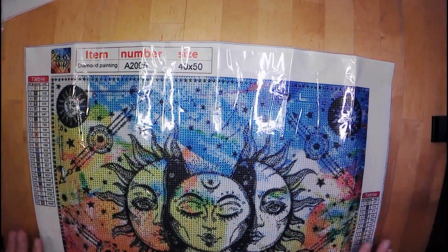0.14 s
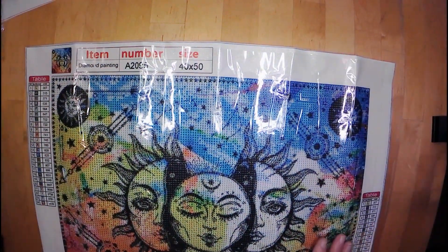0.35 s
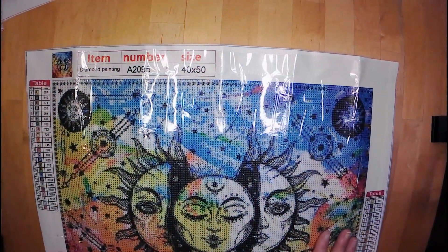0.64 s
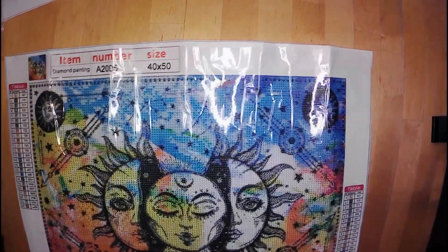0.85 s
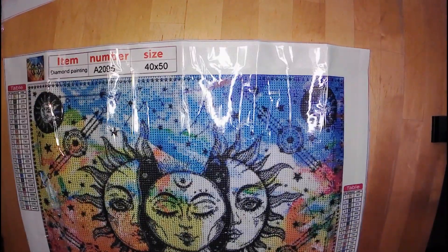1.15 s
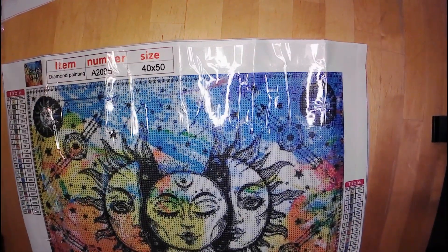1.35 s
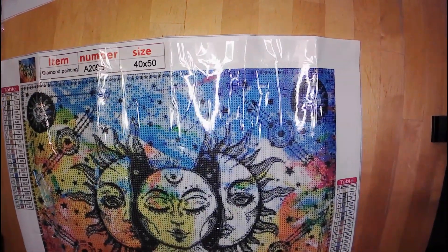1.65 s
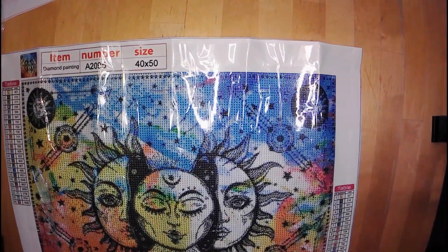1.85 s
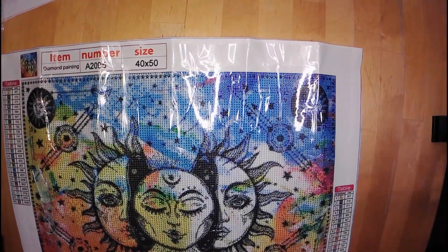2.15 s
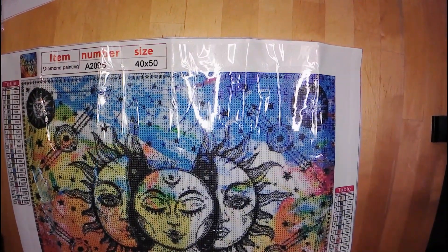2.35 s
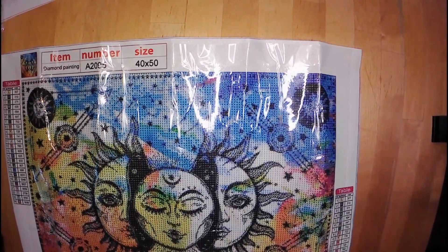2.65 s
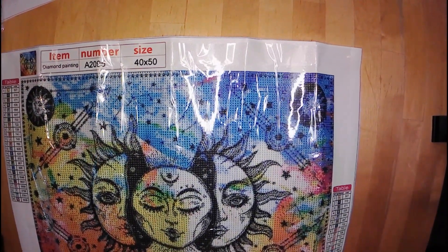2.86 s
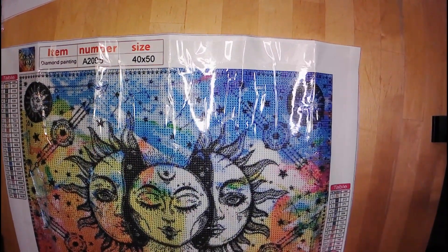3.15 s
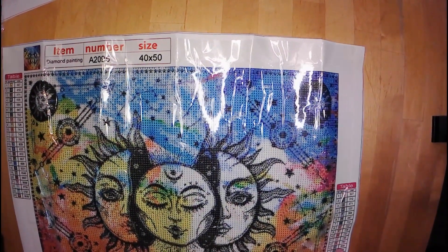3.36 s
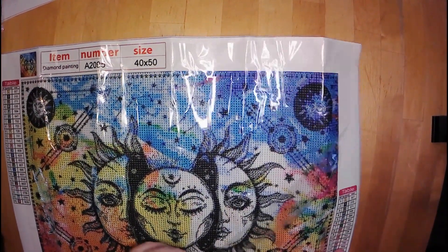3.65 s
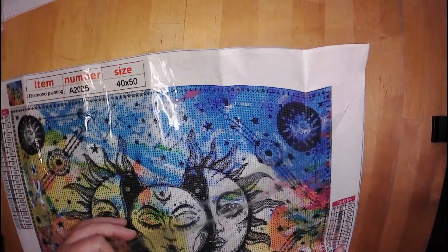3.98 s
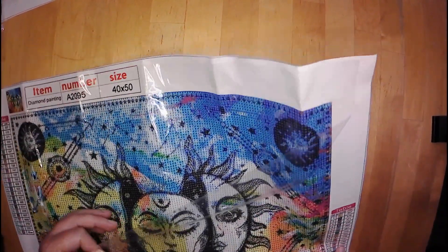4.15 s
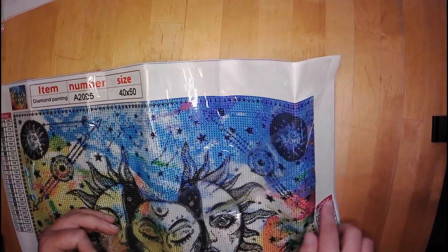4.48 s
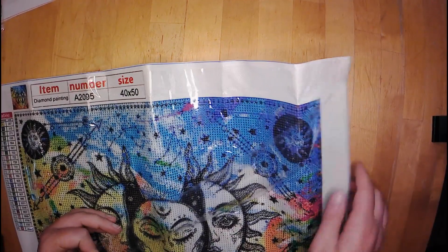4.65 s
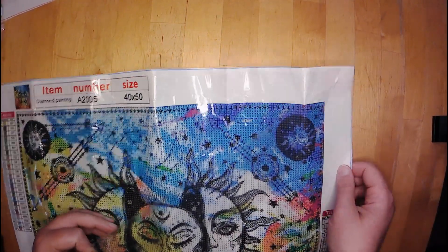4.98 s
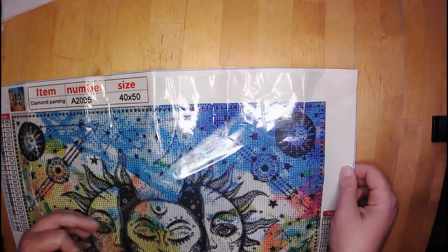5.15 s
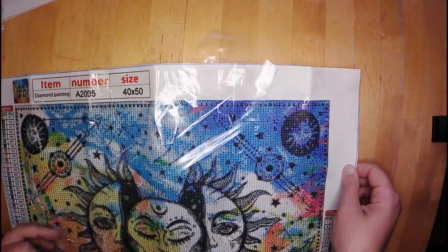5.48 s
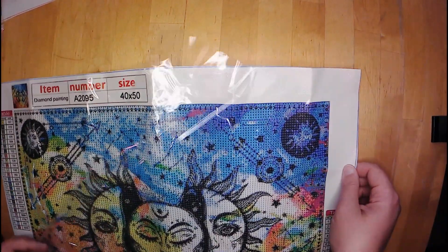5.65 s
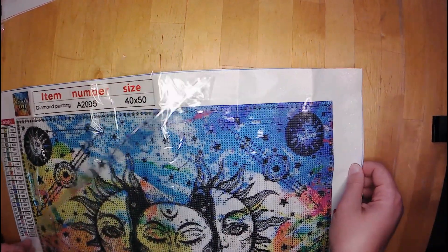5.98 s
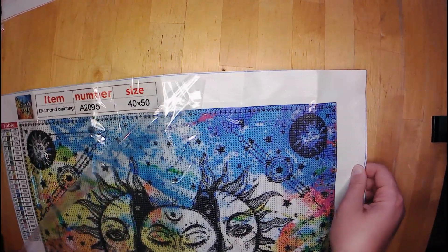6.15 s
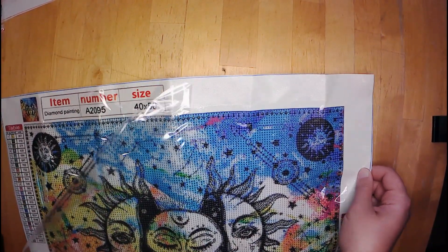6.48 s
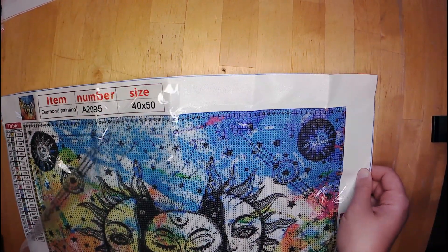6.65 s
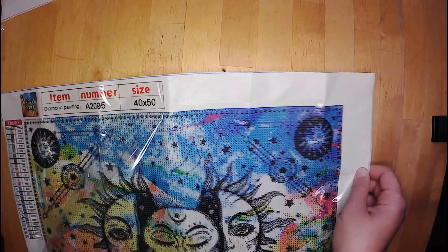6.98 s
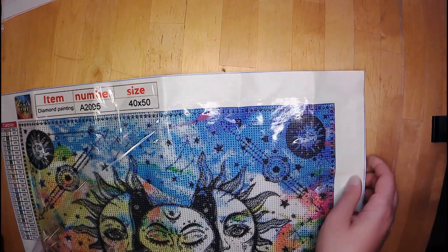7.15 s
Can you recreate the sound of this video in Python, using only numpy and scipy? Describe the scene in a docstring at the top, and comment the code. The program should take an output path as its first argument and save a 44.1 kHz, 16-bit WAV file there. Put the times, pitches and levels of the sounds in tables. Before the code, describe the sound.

Stiff film-covered canvas slides and buckles on a wooden table, crackling and rustling in bursts with soft thumps, clicks and short silent gaps.

```python
"""Film-covered canvas on a wooden table

A stiff canvas under plastic film is unrolled, slid and bent flat on a wooden table in a small room.
The buckling film is resonant clicks, dense or in bursts and snaps; its back hisses as filtered noise.
Hands bump and rub the table: decaying modes and low noise, with a swaying microphone arm.
Ticks, taps and squeaks come from the catching edge and back; a noise gate shuts in the pauses."""
import sys
import numpy as np
from scipy import signal
from scipy.fft import rfft, irfft, next_fast_len
from scipy.io import wavfile
from scipy.ndimage import uniform_filter1d, minimum_filter1d

SR = 44100
rng = np.random.default_rng(int(sys.argv[2]) if len(sys.argv) > 2 else 0)


def log_audio(samples):
    """Write samples as a 16-bit WAV file to the path given in sys.argv[1]."""
    # one column per channel
    frames = np.atleast_2d(samples).T
    # limit to full scale, then quantise
    limited = np.clip(frames, -1, 1)
    pcm = np.round(limited * 32767).astype(np.int16)
    wavfile.write(sys.argv[1], SR, pcm)


N = 322812
T = np.arange(N) / SR  # t/s


def undb(db):
    """Level to amplitude: 20 dB is a factor of ten."""
    return 10 ** (np.asarray(db) / 20)


def unit(x):
    """Normalisation to an rms of 1."""
    return x / np.sqrt(np.mean(x ** 2))


def even(x, window_s):
    """Level control: divide by the running rms, so that it stays near 1."""
    power = uniform_filter1d(x ** 2, int(window_s * SR))
    floor = np.mean(x ** 2) / 1000
    return x / np.sqrt(power + floor)


def add(out, s, sound):
    """Superposition: mix a sound in at a time in seconds."""
    i = max(int(s * SR), 0)
    out[i:i + len(sound)] += sound[:N - i]


def wander(per_s):
    """Smoothed random steps: a slow drift with a spread near 1."""
    step = int(SR / per_s)
    levels = rng.standard_normal(N // step + 1)
    return 1.2 * uniform_filter1d(np.repeat(levels, step)[:N], step)


def colour(x, points):
    """Minimum-phase filter through (f/Hz, level/dB) points: clicks keep their sharp front."""
    size = next_fast_len(len(x) + 4096, True) // 2 * 2
    hz, db = np.transpose(points)
    f = np.maximum(np.arange(size // 2 + 1) * SR / size, 1)
    gain = undb(np.interp(np.log(f), np.log(hz), db))
    # folding the cepstrum onto positive times makes the filter causal
    cepstrum = irfft(np.log(gain))
    cepstrum[1:size // 2] *= 2
    cepstrum[size // 2 + 1:] = 0
    return irfft(rfft(x, size) * np.exp(rfft(cepstrum)))[:len(x)]


def resonate(x, hz, q):
    """Single resonator: two poles, gain 1 at the centre."""
    w = 2 * np.pi * min(hz, SR * .45) / SR
    a = np.sin(w) / (2 * q)
    return signal.lfilter([a, 0, -a], [1 + a, -2 * np.cos(w), 1 - a], x)


def sing(x, hz, q):
    """Cascaded resonance: two equal stages give steep sides; rms 1."""
    return unit(resonate(resonate(x, hz, q), hz, q))


def band(x, hz, kind, order=2):
    """Zero-phase filtering: low-, high- or band-pass without delay."""
    return signal.sosfiltfilt(signal.butter(order, hz, kind, fs=SR, output="sos"), x)


def ring(modes):
    """Modal superposition: one second of decaying sines from rows of f/Hz, level/dB, T60 t/s."""
    t = T[:SR]
    return sum(undb(db - 60 * t / t60) * np.sin(2 * np.pi * hz * t) for hz, db, t60 in modes)


def stroke(start, end, attack_s, release_s, growth_db=0):
    """Envelope of one movement: linear onset, growth to 1 at its end, exponential decay."""
    to_go = np.clip((end - T) / (end - start), 0, 1)
    onset = np.clip((T - start) / attack_s, 0, 1)
    decay = np.exp(-np.maximum(T - end, 0) / release_s)
    return onset * undb(-growth_db * to_go) * decay


def scatter(clicks, decay_s, db):
    """Diffuse scattering: each click runs on through the sheet as a short noise tail."""
    p = np.exp(-2 / (decay_s * SR))
    energy = signal.lfilter([1 - p], [1, -p], clicks ** 2)
    return clicks + undb(db) * np.sqrt(energy) * rng.standard_normal(len(clicks))


def disperse(x, spread_s=0.000905):
    """Dispersion of bending waves in a thin sheet: the treble leads and the lows trail."""
    size = next_fast_len(len(x) + 1024, True) // 2 * 2
    f = np.arange(size // 2 + 1) * SR / size
    delay_s = spread_s * np.sqrt(3000 / (f + 500))
    # phase is the running sum of group delay over frequency
    phase = 2 * np.pi * np.cumsum(delay_s - delay_s[-1]) * SR / size
    return irfft(rfft(x, size) * np.exp(-1j * phase))[:len(x)]


def flip(hz, q, decay_s, rattle_db):
    """Impulse response of one buckle: sharp cycles, then a brief rattle; rms 1 over the first ms."""
    click = resonate(scatter(signal.unit_impulse(SR // 50), decay_s, rattle_db), hz, q)
    return click / np.sqrt(np.mean(click[:SR // 1000] ** 2))


# spectral shape of the film: f/Hz, relative level/dB
FILM_SPECTRUM = [(150, -17.5), (300, -6.5), (560, -8), (800, -6.5), (1200, -6.5), (2000, -4.5), (3000, -3),
                 (7200, -4), (10500, -7.5), (14000, -15.5), (16000, -21)]
CLICK_DECAY_S = .001


def crinkle(per_s, spread_db, q=1.4, drift_db=2.5, long_share=.12, count=9):
    """Random buckling: clicks of many sizes and pitches, held at an even overall level."""
    # one buckle sets off its neighbours, so the clicks come in flurries
    fires = rng.random(N) < per_s * undb(4 * wander(70)) / SR
    sizes = undb(spread_db * np.minimum(rng.exponential(size=N), 3))
    clicks = fires * sizes * rng.choice([-1, 1], N)
    # small, high-pitched facets buckle more often; a long crease strikes all sizes at once
    facet = (count * rng.random(N) ** .75).astype(int)
    long_crease = rng.random(N) < long_share
    spill = rng.standard_normal(N)
    out = 0
    for k, hz in enumerate(np.geomspace(1000, 14000, count)):
        strikes = clicks * np.where(long_crease, 0.46 * np.roll(spill, k), facet == k)
        ringing = unit(resonate(scatter(strikes, CLICK_DECAY_S, 0.99), hz, q))
        # as the bend moves, facets of other sizes take over
        out = out + ringing * np.sqrt(hz) * undb(drift_db * wander(12))
    return even(colour(disperse(out), FILM_SPECTRUM), window_s=0.053)


def rustle(clicks, gains, hiss_db, body_hz, middle_db, body_db, treble_db, bend_s=0.19):
    """Friction noise under buckling clicks, in three bands that follow the movement of the sheet."""
    hiss = unit(colour(rng.standard_normal(N), FILM_SPECTRUM)) * undb(5.4 * wander(60))
    sound = (clicks + undb(hiss_db) * hiss) / np.hypot(1, undb(hiss_db))
    body = band(sound, body_hz, "low", order=3)
    treble = band(sound, 8000, "high")
    middle = sound - body - treble
    parts = [undb(middle_db) * unit(middle),
             undb(body_db) * even(body, bend_s),
             undb(treble_db) * even(treble, bend_s)]
    return np.sum(gains * parts, axis=0)


# hands and canvas landing on the table: t/s, relative level/dB
THUMPS = [(0.065, -34.5), (0.199, -39.5), (0.356, -7.5), (0.504, -16.5), (1.447, -17), (1.632, -22.5),
          (1.822, -26), (2.284, -11.5), (2.444, -17), (3.874, -25)]
# modes of table and microphone arm: f/Hz, relative level/dB, T60 t/s
TABLE_MODES = [(26.35, 0.5, 0.73), (53, -12.5, 0.35), (79, -15.5, 0.22), (122.3, -10, 0.11),
               (170, 0.5, 0.14), (195, -3.5, 0.38)]
# spectral shapes of the swaying arm and of the rubbed table top: f/Hz, relative level/dB
SWAY_SPECTRUM = [(7, 14), (24, 1), (42, -11), (200, -79)]
WOOD_SPECTRUM = [(35, -11.5), (55, -14), (90, 1.5), (142, -7), (163, 3), (190, -3.5), (260, -7.5),
                 (800, -39)]
# a hand rubs over the table top: start t/s, end t/s, rumble level/dB, drone level/dB
RUBS = [(4.034, 4.316, -49, -61), (5.514, 5.722, -56.5, -80), (6.344, 6.467, -50, -56.5),
        (6.682, 6.913, -55.5, -47), (6.798, 7.02, -48, -84)]
CONTACT_AT_0DB_S = .0068
SWAY_RISE_S, SWAY_DECAY_S, SWAY_DB = 0.049, 0.6, -14.5
RUB_ATTACK_S, RUB_RELEASE_S = 0.017, 0.06
DRONE_HZ, DRONE_Q = 165.5, 11  # Q of each of two stages


def table(motion, drag_db=-10, lean_db=8):
    """Modal excitation: soft blows ring the table and sway the arm; rubbing adds low noise."""
    out, sway, rumble, drone = np.zeros((4, N))
    for s, db in THUMPS:
        # gentler blows press for longer
        contact_s = CONTACT_AT_0DB_S * undb(-.3 * db)
        push = np.sin(np.pi * np.minimum(T[:SR // 20] / contact_s, 1)) ** 2
        add(out, s, -undb(db) * signal.fftconvolve(ring(TABLE_MODES), push / push.sum()))
        sway += undb(db + SWAY_DB) * stroke(s, s + SWAY_RISE_S, SWAY_RISE_S, SWAY_DECAY_S)
    for start, end, rumble_db, drone_db in RUBS:
        hand = stroke(start, end, RUB_ATTACK_S, RUB_RELEASE_S)
        rumble += undb(rumble_db) * hand
        drone += undb(drone_db) * hand
    noise = rng.standard_normal((4, N))
    # a rubbing hand leans on the table and sways the arm too
    out += (sway + undb(lean_db) * rumble) * unit(colour(noise[0], SWAY_SPECTRUM))
    # the moving canvas drags on the wood
    out += undb(drag_db) * motion * unit(colour(noise[1], WOOD_SPECTRUM)) * undb(1.5 * wander(25))
    return out + rumble * sing(noise[2], hz=47.7, q=0.64) + drone * sing(noise[3], DRONE_HZ, DRONE_Q)


# a fold gives way in a burst of clicks: t/s, relative level/dB
BURSTS = [(0.0665, -25.5), (0.203, -34.5), (0.23, -31), (0.3033, -33.5), (0.489, -16.5), (0.5174, -14.5),
          (1.8231, -23.5), (2.122, -27.5), (2.2869, -27.5), (3.883, -25.5), (4.299, -30), (4.457, -25),
          (4.4996, -21.5), (4.547, -23), (4.75, -23), (4.777, -27), (4.827, -28.5), (4.9348, -29.5),
          (5.4988, -16), (5.567, -16), (5.966, -29), (6.216, -18), (6.301, -16.5), (6.3573, -20.5),
          (6.5048, -16)]


def bursts(front_s=0.011, decay_s=0.036, db=-9.5):
    """Sudden release: a fold lets go at once and its clicks die away in two exponentials."""
    force, t = np.zeros(N), T[:SR // 4]
    for s, peak_db in BURSTS:
        fall = (np.exp(-t / front_s) + np.exp(-t / decay_s)) / 2
        add(force, s, undb(peak_db + db) * fall)
    return force * crinkle(per_s=3700, spread_db=4.5, count=8)


# single creases snapping through: t/s, relative level/dB, f/Hz
SNAPS = [(0.0722, -26, 8000), (0.328, -26, 7400), (0.518, -17, 8400), (0.817, -18, 5700),
         (0.901, -23, 5000), (0.9184, -18.5, 7900), (0.9664, -11, 6800), (0.978, -16, 7600),
         (1.001, -18, 6500), (1.191, -19.5, 7200), (1.216, -23, 7600), (1.2893, -22.5, 7270),
         (1.4798, -25, 7700), (1.5585, -25, 7700), (1.5962, -24, 4200), (1.6866, -31, 7350),
         (2.128, -34, 6400), (2.6856, -23, 6500), (2.987, -26, 7400), (3.3115, -20, 6870),
         (3.3866, -22, 7660), (3.575, -27, 4600), (3.595, -20.5, 4800), (3.6283, -25.5, 5470),
         (3.6594, -23.5, 5130), (3.697, -27.5, 6000), (3.7313, -27, 3440), (3.7624, -24.5, 3530),
         (3.792, -20.5, 4720), (3.839, -29.5, 3130), (3.929, -24, 4130), (3.951, -25.5, 3400),
         (3.973, -32, 3000), (4.122, -30, 6200), (4.224, -28.5, 5540), (4.3067, -22.5, 5360),
         (4.497, -25.5, 7160), (4.7808, -21, 6240), (5.6083, -21, 8740), (5.703, -23, 5850),
         (5.7095, -20, 5900), (6.035, -18.5, 9000), (6.0683, -28, 7700), (6.126, -27, 7400),
         (6.1417, -20, 9200), (6.219, -35, 5370), (6.326, -23.5, 6100), (6.6565, -32, 4260),
         (6.845, -22, 8150), (6.909, -30, 2380), (7.0608, -24.5, 3000), (7.1338, -25, 2620)]


def snaps():
    """Snap-through instability: a crease flips over at its own pitch."""
    out = np.zeros(N)
    for s, level_db, hz in SNAPS:
        add(out, s, undb(level_db) * flip(hz, q=1.9, decay_s=.003, rattle_db=0))
    return disperse(out, spread_s=.0006)


# the sheet is bent until the fold gives:
# start t/s, end t/s, relative final level/dB, growth on the way level/dB
FLEXES = [(0.316, 0.494, -49.5, -6.5), (0.556, 0.67, -46.5, -4), (1.882, 2.015, -35.5, 6),
          (2.288, 2.448, -46, 15.5), (3.588, 4.286, -46, -3), (4.03, 4.055, -34.5, 25),
          (4.291, 4.385, -34, 6.5), (4.468, 4.661, -31, 20.5), (5.495, 5.643, -34.5, 0),
          (5.668, 5.742, -30, 3), (5.76, 5.889, -48, -17.5), (5.97, 6.248, -39, -1),
          (6.378, 6.464, -32.5, 20), (6.518, 6.635, -38.5, -3.5), (6.641, 6.69, -31.5, 3),
          (6.747, 6.783, -32, 5), (6.813, 7.072, -33, 0), (7.097, 7.144, -37.5, 0), (7.205, 7.31, -26, 13)]
FLEX_ATTACK_S, FLEX_RELEASE_S = 0.0048, 0.026
FLEX_BODY_DB, FLEX_TREBLE_DB = -10, -4  # against the middle gain
FLEX_HISS_DB = -6.5  # hiss against clicks
SETTLE_DB, SETTLE_S = -37, .05  # level against the bend, decay


def flexing():
    """Bending load and relaxation: gains of middle, body and treble as the sheet bends and settles."""
    middle = np.zeros(N)
    for start, end, db, growth_db in FLEXES:
        bend = stroke(start, end, FLEX_ATTACK_S, FLEX_RELEASE_S, growth_db)
        settling = undb(SETTLE_DB) * stroke(start, end, end - start, SETTLE_S)
        middle = np.maximum(middle, undb(db) * np.maximum(bend, settling))
    return np.array([middle, middle * undb(FLEX_BODY_DB), middle * undb(FLEX_TREBLE_DB)])


# the textured back catches and slips in a quick run of ticks:
# start t/s, end t/s, tick rate f/Hz, relative tick level/dB, pitch f/Hz
RATCHETS = [(0.4163, 0.482, 29.8, -29, 5200), (0.596, 0.629, 62, -26, 6300),
            (0.665, 0.702, 56, -24.5, 8000), (0.7129, 0.797, 109, -24, 7560), (0.83, 0.94, 102, -25, 6320),
            (1.2077, 1.268, 150, -21, 7450), (1.3057, 1.592, 96, -27.5, 7140),
            (2.63, 2.773, 63, -27.5, 6500), (3.044, 3.272, 94, -39, 7500), (3.359, 3.562, 78, -25, 5520)]


def ratchets(jitter_s=.0005, q=0.53, spread_db=1.0, pitch_spread=0.27):
    """Stick-slip friction: nearly even ticks, each of its own strength and pitch."""
    out = np.zeros(N)
    for start, end, per_s, db, hz in RATCHETS:
        count = int((end - start) * per_s) + 1
        for k, (late, size, pitch) in enumerate(rng.standard_normal((count, 3))):
            tick = flip(hz * np.exp(pitch_spread * pitch), q, decay_s=0.002, rattle_db=3)
            add(out, start + k / per_s + jitter_s * late, undb(db + spread_db * size) * tick)
    return out


# the stiff edge of the canvas taps the wood: t/s, peak level/dB
TAPS = [(0.526, -20.5), (1.616, -8.5), (5.68, -21)]
# modes the edge rings with: f/Hz, relative level/dB, T60 t/s
EDGE_MODES = [(1170, 1.5, 0.0079), (2900, -0.5, 0.0032)]


def taps():
    """Impact: the canvas edge knocks on the wood and rings in damped modes."""
    out, knock = np.zeros(N), ring(EDGE_MODES)
    for s, db in TAPS:
        add(out, s, undb(db) * knock / np.abs(knock).max())
    return out


# the canvas is pushed across the table twice, one list a push: t/s, relative level/dB
SLIDES = [
    [(0.68, -43), (0.8, -36.5), (0.91, -31), (1.0, -24.5), (1.078, -29.5), (1.238, -29.5), (1.308, -37.5),
     (1.57, -36.5), (1.614, -29.5), (1.815, -46)],
    [(2.455, -37.5), (2.677, -35.5), (2.727, -28.5), (2.757, -31.5), (3.005, -35), (3.015, -39),
     (3.263, -35.5), (3.285, -29.5), (3.585, -31.5)],
]
# colour of the sliding: t/s, body level/dB, treble level/dB, both against the middle gain
SLIDE_COLOUR = [(0.68, 0.5, 4.5), (0.94, -13.5, -2.5), (1.05, -12.5, -6), (1.44, -7, 5.5), (1.8, -7, -3.5),
                (2.459, -6, -2.5), (2.75, -14.5, 2), (3.101, -8.5, 2), (3.6, -18.5, -6)]
SLIDE_FADE_S = 0.018
SLIDE_HISS_DB = -7  # hiss against clicks


def sliding():
    """Sliding friction: gains of middle, body and treble while the canvas is pushed."""
    level = np.zeros(N)
    for push in SLIDES:
        s, db = np.transpose(push)
        level += undb(np.interp(T, s, db, left=-np.inf, right=-np.inf))
    level = uniform_filter1d(level, int(SLIDE_FADE_S * SR))
    s, body_db, treble_db = np.transpose(SLIDE_COLOUR)
    return level * undb([np.zeros(N), np.interp(T, s, body_db), np.interp(T, s, treble_db)])


# the edge catches on the wood and squeaks: start t/s, end t/s, relative level/dB
SQUEAKS = [(1.537, 1.646, -47.5), (1.896, 1.906, -33.5), (1.945, 1.985, -46)]
SQUEAK_HZ, SQUEAK_Q = 1260, 1.4  # Q of each of two stages


def squeaks(clicks, attack_s=.004, release_s=0.0085):
    """Sustained excitation: dense catches of the edge keep one of its modes ringing."""
    force = sum(undb(db) * stroke(start, end, attack_s, release_s) for start, end, db in SQUEAKS)
    return force * even(sing(clicks, SQUEAK_HZ, SQUEAK_Q), window_s=.03)


def mirror(x, gap_s=0.000791, db=-12):
    """Comb filtering: the table mirrors the sheet, and the colour shifts with the gap under it."""
    delay_s = gap_s * np.exp(.16 * wander(7))
    reflection = np.interp(T - delay_s, T, x)
    return (x + undb(db) * reflection) / np.hypot(1, undb(db))


ROOM_T60_S, ROOM_DB = 0.2, -7
WALL_S, WALL_DB = 0.0088, -24  # echo of the nearest wall


def room(x, delay_s=0.0049):
    """Early reflection and reverberation: one wall echo and a short, duller diffuse tail."""
    t = T[:SR // 2]
    tail = rng.standard_normal(len(t)) * np.exp(-np.log(1000) * t / ROOM_T60_S) * (t > delay_s)
    tail /= np.linalg.norm(tail)
    tail = colour(tail, [(200, 10.0), (4000, -6.0), (9000, -4.0), (16000, -32.0)])
    out = x + undb(ROOM_DB) * signal.fftconvolve(x, tail)[:N]
    add(out, WALL_S, undb(WALL_DB) * x)
    return out


def scene():
    """Superposition of canvas and table in the room, over a faint background hiss."""
    air = undb(-66) * unit(colour(rng.standard_normal(N), [(100, -7.5), (16000, -40)]))
    clicks = crinkle(per_s=1400, spread_db=2)
    slide, flex = sliding(), flexing()
    # the curved sheet rings near one pitch
    curved = unit(clicks + undb(-4) * resonate(clicks, hz=2980, q=1.6))
    sheet = rustle(unit(clicks), slide, SLIDE_HISS_DB, body_hz=2520,
                   middle_db=-5.5, body_db=-3.4, treble_db=-4)
    sheet += rustle(curved, flex, FLEX_HISS_DB, body_hz=2070,
                    middle_db=-2.5, body_db=-2.5, treble_db=0.0)
    sheet = mirror(sheet + bursts() + ratchets()) + snaps() + squeaks(clicks)
    # the body of the rustle is what reaches the wood
    motion = slide[1] + undb(-4.5) * flex[1]
    return (room(sheet) + taps() + table(motion) + air)[None]


GATE_DB = -59.5


def gate(x, window_s=0.0047, hold_s=0.0118):
    """Threshold gating: mutes while all above the rumble stays under the threshold."""
    window, hold = int(window_s * SR), int(hold_s * SR)
    power = uniform_filter1d(band(x, 119, "high") ** 2, window)
    quiet = 1. * (power < undb(GATE_DB) ** 2)
    # it shuts only after a full hold time of quiet
    shut = minimum_filter1d(quiet, hold, origin=(hold - 1) // 2)
    return x * uniform_filter1d(1 - shut, window)


TOP_HZ = 16000


def record(dry):
    """Gating, then band limiting: a steep low-pass cuts the top."""
    low_pass = signal.ellip(10, .2, 80, TOP_HZ, fs=SR, output="sos")
    return signal.sosfilt(low_pass, gate(dry[0]))[None]


dry = scene()
out = record(dry)
log_audio(out)
```